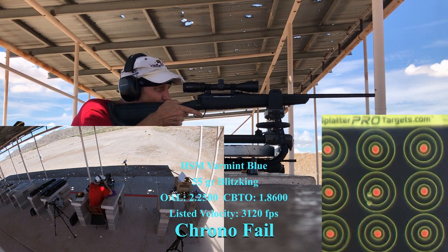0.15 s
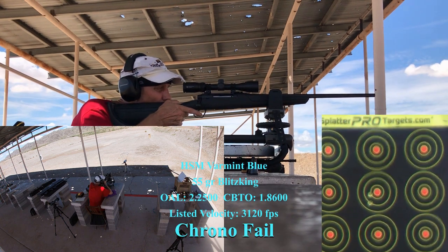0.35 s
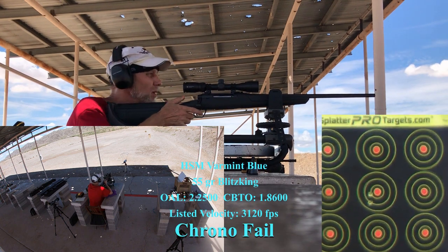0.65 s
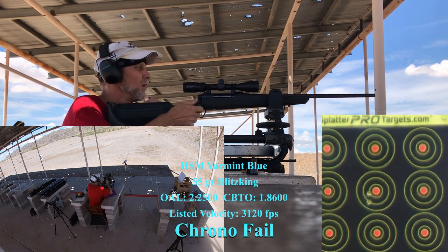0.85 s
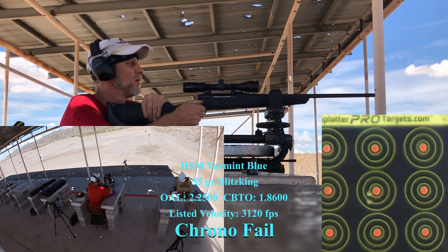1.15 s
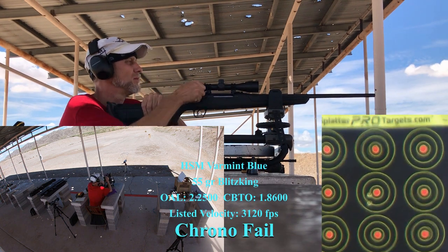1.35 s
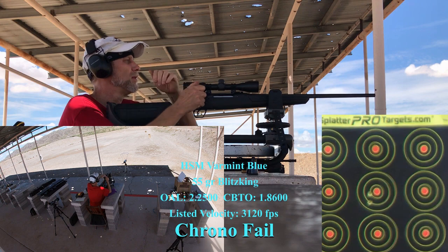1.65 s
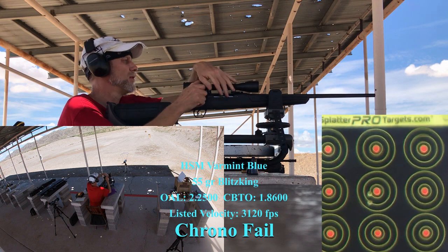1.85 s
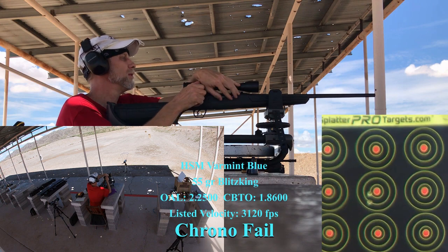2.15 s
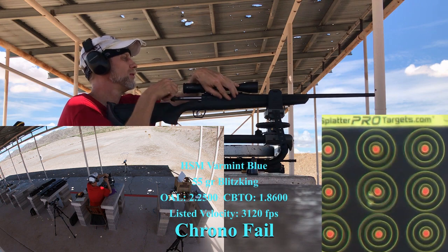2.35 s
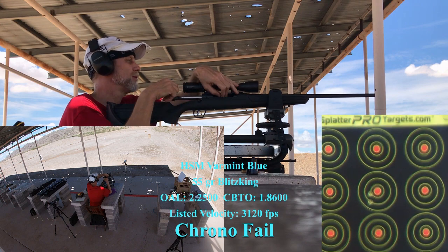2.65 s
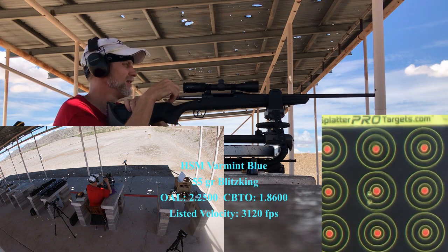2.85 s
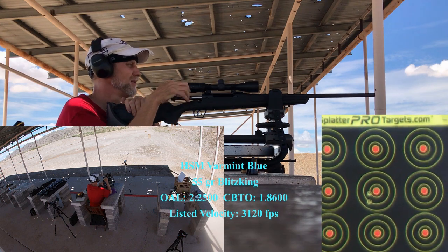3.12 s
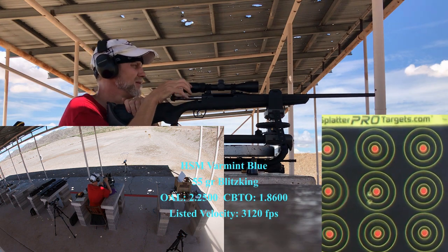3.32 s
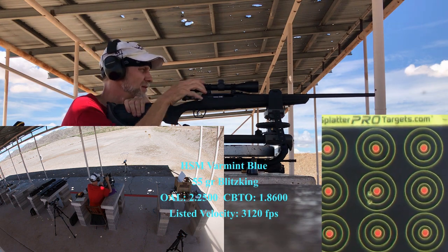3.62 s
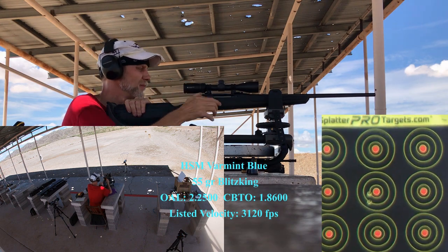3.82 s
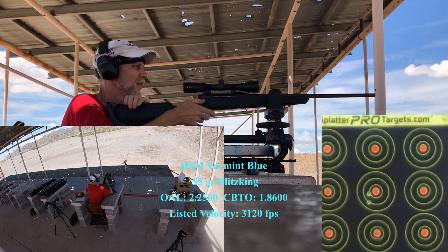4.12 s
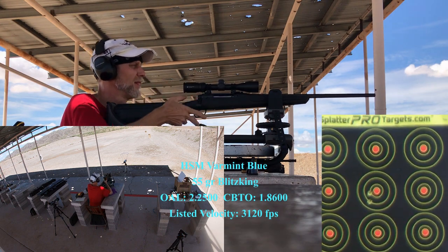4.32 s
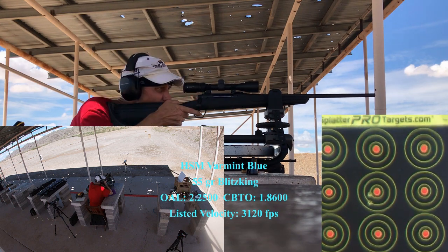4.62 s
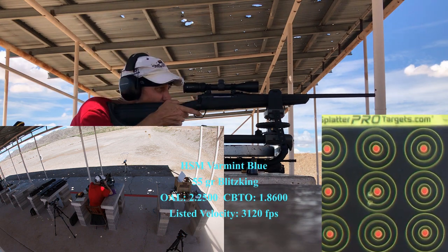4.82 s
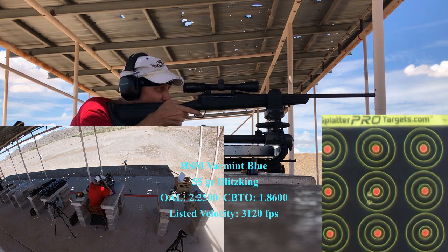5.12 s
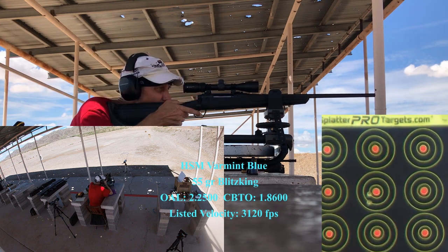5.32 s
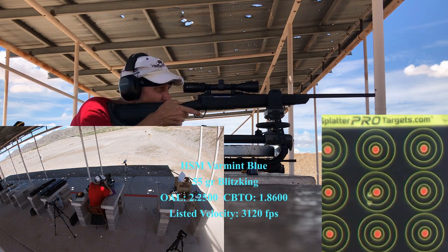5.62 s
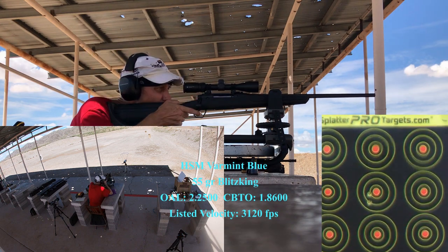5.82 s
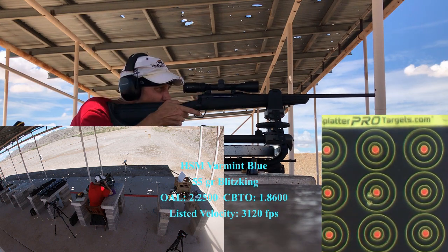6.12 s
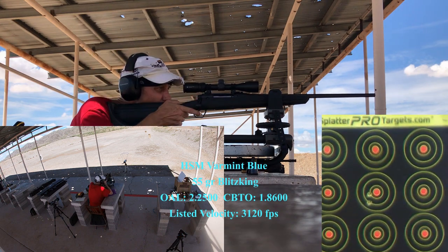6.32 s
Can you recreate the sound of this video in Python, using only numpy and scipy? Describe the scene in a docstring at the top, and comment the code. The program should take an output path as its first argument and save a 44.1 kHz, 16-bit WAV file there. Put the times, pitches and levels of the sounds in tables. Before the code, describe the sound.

A rifle bolt is lifted, yanked back with a brass ping, then shoved forward and locked with hard steel clacks under an outdoor range roof.

```python
"""Under the roof of an outdoor range: light wind on the microphone, a wide hiss, a far machine's hum and a
rolling echo; loose brass tinkles on the bench. Then a rifle bolt straight ahead is lifted and pulled back
(the spent case pings and is picked out), pushed forward and locked; hand and sleeve rub from the pull on.
Each steel contact is a noise crack plus ringing modes of action and stock, answered by the roof.
Other rifles thump further off, between and after the strokes, as pressure waves with scattered noise."""
import sys
import numpy as np
from scipy import signal
from scipy.fft import rfft, irfft, next_fast_len
from scipy.io import wavfile
from scipy.ndimage import uniform_filter1d, map_coordinates

SR = 44100
rng = np.random.default_rng(int(sys.argv[2]) if len(sys.argv) > 2 else 0)


def master_out(mix):
    """Clip the mix to full scale and print it as 16-bit PCM to the path in sys.argv[1]."""
    frames = np.transpose(np.atleast_2d(mix))
    ceiling = np.clip(frames, -1, 1)
    pcm = np.round(ceiling * 32767).astype(np.int16)
    wavfile.write(sys.argv[1], SR, pcm)


N = 285194  # length in samples


def amp(db):
    """Decibels to gain."""
    return 10 ** (np.asarray(db) / 20)


def unit(x):
    """Scaled to rms 1."""
    return x / np.sqrt(np.mean(x ** 2) + 1e-20)


def along(points, hz):
    """Values at hz, read between (Hz, value) points on a log axis."""
    f, v = np.transpose(points)
    return np.interp(np.log(hz + 1), np.log(f + 1), v)


def level(rows):
    """Gain per sample from (s, dB) rows."""
    s, db = np.transpose(rows)
    return amp(np.interp(np.arange(N) / SR, s, db))


def wobble(rate):
    """A smooth random curve, rate knots a second."""
    knots = rng.standard_normal(int(N * rate / SR) + 4)
    return map_coordinates(knots, [np.arange(N) * rate / SR])


def filtered(x, response):
    """x times a response of frequency."""
    n = x.shape[-1]
    m = next_fast_len(n + 8192)
    return irfft(rfft(x, m) * response(np.fft.rfftfreq(m, 1 / SR)), m)[..., :n]


def noise(spectrum, size, tilt=0):
    """Coloured noise of rms 1, tilted in dB per octave between 1200 and 8000 Hz."""
    def colour(hz):
        octaves = np.log2(np.clip(hz, 1200, 8000))
        return amp(along(spectrum, hz) + tilt * octaves)
    return unit(filtered(rng.standard_normal(size), colour))


def fade(t, t60):
    """Exponential decay, 60 dB in t60 seconds."""
    return np.exp(-np.log(1000) * t / t60)


def dying(spectrum, t60s, size):
    """Noise of rms 1 before its decay, each frequency dying at its own speed."""
    hz, t, z = signal.stft(noise(spectrum, size), SR, nperseg=256)
    decay = fade(t, along(t60s, hz)[:, None])
    return signal.istft(z * decay, SR, nperseg=256)[1][:size]


def ring(modes, t, scatter_db, detune):
    """Struck modes as decaying sines; strengths and pitches vary at random from strike to strike."""
    total = 0
    for hz, db, t60 in modes:
        strength = amp(db + scatter_db * rng.normal())
        pitch = hz * (1 + detune * rng.normal())
        total = total + strength * fade(t, t60) * np.sin(2 * np.pi * pitch * t)
    return total


def add(track, s, sound):
    """Mix a sound into a track at time s."""
    part = track[..., round(s * SR):][..., :sound.shape[-1]]
    part += sound[..., :part.shape[-1]]


def spread(mid, side):
    """Left and right from mid and side."""
    return np.array([mid + side, mid - side])


def stroke(s, db, attack, hold, release):
    """Gain per sample of one movement: it speeds up until s, holds, then slows down."""
    t = np.arange(N) / SR - s
    return amp(db) * fade(np.maximum(-t, 0), attack) * fade(np.maximum(t - hold, 0), release)


def patchy(x, depth_db, width_size=5, span_size=9):
    """Bands several hundred Hz wide that swell and sink at random."""
    z = signal.stft(x, nperseg=256)[2]
    field = uniform_filter1d(rng.standard_normal(z.shape), width_size, axis=0)  # across frequency
    field = uniform_filter1d(field, span_size, axis=1)  # across time
    return unit(signal.istft(z * amp(depth_db * unit(field)), nperseg=256)[1][:len(x)])


# Decay of the sound under the roof. Each row: frequency in Hz, t60 in seconds.
ROOF_T60 = [(200, 0.49), (1000, 0.32), (3000, 0.35), (7000, 0.45), (14000, 0.1)]
# Colour of the roof's answer. Each row: frequency in Hz, relative level in dB.
ROOF_COLOUR = [(150, 7.5), (600, 1), (950, -3.5), (1400, 0), (2300, 1.5), (4500, -5), (8000, -8),
               (15000, -12.5)]


def roofed(x, wet_db, delay=0.014, early_db=-6, late_db=-9, slap_t60=0.16, side_db=-10, near_db=-13):
    """A sound with its surroundings: the bench scatters early, the roof answers later and lingers."""
    t = np.arange(SR // 2) / SR
    bench = amp(early_db) * (t > .003)
    slap = np.where(t < delay, bench, fade(np.abs(t - delay), slap_t60))

    def tail():
        linger = amp(late_db) * (t > delay) * dying(ROOF_COLOUR, ROOF_T60, len(t))
        return slap * noise(ROOF_COLOUR, len(t)) + linger

    answer = spread(tail(), amp(side_db) * tail())
    answer = amp(wet_db) * answer / np.linalg.norm(answer[0])
    near = rng.standard_normal(len(t)) * fade(t, .012)  # scope and tripod reflect differently to each side
    answer = answer + spread(0, amp(near_db) * near / np.linalg.norm(near))
    return x + signal.fftconvolve(x[None], answer, axes=1)[:, :len(x)]


# First reflection off the roof. Each row: frequency in Hz, gain in dB.
REFLECTION = [(500, -25), (2500, -10), (4500, -17.5), (9000, -28)]
REFLECTION_S = .0195  # its delay in seconds


def reflected(x):
    """A sound and its first, weaker and coloured reflection off the roof."""
    def response(hz):
        return amp(along(REFLECTION, hz)) * np.exp(-2j * np.pi * hz * REFLECTION_S)
    return x + filtered(x, response)


# Gusts at the microphone. Each row: time of the peak in seconds, relative buffet level in dB,
# time from peak to 1/e in seconds, relative level in dB of the eddies that differ left to right.
GUSTS = [(.1, -45, 0.23, -48), (1.1, -45, 0.38, -71), (1.9, -41.5, 0.5, -55.5), (3.08, -40, 0.094, -78),
         (5.48, -37.5, 0.16, -81), (6.42, -35.5, 0.28, -81)]
CALM_DB = -56.5  # buffeting between gusts, on the scale of the buffet column


def gusts():
    """Gain per sample of buffeting and eddies: every gust swells and sinks like a bell curve."""
    t = np.arange(N) / SR
    buffet, eddies = amp(CALM_DB), 0
    for s, db, width, eddy_db in GUSTS:
        swell = np.exp(-((t - s) / width) ** 2)
        buffet = buffet + amp(db) * swell
        eddies = eddies + amp(eddy_db) * swell
    return buffet, eddies


# Wind rumble, also the boom of far shots. Each row: frequency in Hz, relative level in dB per Hz.
RUMBLE = [(12, -15), (25, 0), (60, 1.5), (100, -7), (150, -15), (300, -36.5), (800, -59.5)]
# Level of the range's wash and hum: falls by 1 s, then grows again.
# Each row: time in seconds, relative level in dB.
RANGE_LEVEL = [(0, -49), (.6, -49), (1.0, -61), (2.4, -50.5), (4.2, -50.5), (4.65, -46.5), (6.47, -48.5)]
# Wash of the open range. Each row: frequency in Hz, relative level in dB per Hz.
AIR = [(59, -37), (100, -12.5), (170, 0), (197, -3.5), (343, -13), (836, -23.5), (3470, -41), (4200, -42),
       (7610, -50.5), (9410, -47), (10900, -53), (14400, -47.5), (16000, -62.5)]
# Steady wide hiss. Each row: frequency in Hz, relative level in dB per Hz.
HISS = [(60, -5.5), (400, -1.5), (1100, 7), (2500, -8.5), (6500, -15.5), (8000, -23), (15000, -32)]


def outdoors(wind_db=-2.0, air_db=0, hiss_db=-65, side_db=-9, hum_hz=168, hum_db=-1):
    """Wind noise buffets the microphone over the range's wash, a hiss and a machine's wavering sine hum."""
    buffet, swirl = gusts()
    wind = buffet * amp(wind_db + 2.3 * wobble(6.2)) * noise(RUMBLE, N)
    eddy_colour = [(15, -9), (70, 6.5), (140, -9.0), (300, -23), (900, -67.0)]  # (Hz, dB per Hz)
    eddies = swirl * amp(3 * wobble(7)) * noise(eddy_colour, N)
    air = level(RANGE_LEVEL) * amp(air_db + 2.8 * wobble(12)) * noise(AIR, N)
    hiss = amp(hiss_db) * spread(noise(HISS, N), amp(side_db) * noise(HISS, N))
    phase = 2 * np.pi * np.cumsum(hum_hz + 3 * wobble(10)) / SR
    hum = level(RANGE_LEVEL) * amp(hum_db + 4.1 * wobble(11)) * np.sin(phase)
    return spread(wind + air + hum, eddies) + hiss


# Echoes of far shots. Each row: start in seconds, level in dB, rise constant in seconds,
# width as side level in dB.
ROLLS = [(0, -34, 0.0011, -1), (4.48, -46, 0.022, -24)]
# Colour of a rolling echo. Each row: frequency in Hz, relative level in dB per Hz.
ROLL = [(40, -10), (220, -2.5), (450, -8.5), (900, -9), (1800, -20), (4000, -25), (7000, -35.5),
        (15000, -49.5)]
# Decay of a rolling echo. Each row: frequency in Hz, t60 in seconds.
ROLL_T60 = [(200, 8.44), (450, 1.9), (1000, 0.76), (3500, 0.62), (10000, 0.3)]


def rolling_echo():
    """Far shots die away over the range as noise, treble first."""
    out, t = np.zeros((2, N)), np.arange(N) / SR
    for s, db, rise, side_db in ROLLS:
        middle = dying(ROLL, ROLL_T60, N)
        side = amp(side_db) * fade(t, 2.3) * dying(ROLL, ROLL_T60, N)
        add(out, s, amp(db) * (1 - np.exp(-t / rise)) * spread(middle, side))
    return out


# Touches of brass on the bench. Each row: start in seconds, ring level in dB, tick level in dB.
TINKLES = [(.28, -65, -58), (.49, -69, -65), (.624, -69, -50), (.823, -68, -56), (1.966, -62.5, -68),
           (2.001, -60.5, -68)]
# Modes of the loose brass. Each row: frequency in Hz, relative level in dB, t60 in seconds.
LOOSE_BRASS = [(7000, -8, .35), (9730, -2, 0.33), (10250, -9.5, 0.23), (14300, -1, .25)]
# Colour of a tick or a steel contact. Each row: frequency in Hz, relative level in dB per Hz.
CRACK = [(60, -55.5), (250, -33), (600, -13.5), (1500, -4.5), (2500, -3), (4000, -0.5), (4900, -8),
         (6600, 2), (7700, -11), (9500, -5.5), (10600, -16), (13000, -6), (16000, -17.5)]


def loose_brass(tick_t60=0.03):
    """Light touches of loose brass: a tiny noise tick and a thin ring of modes."""
    out, t = np.zeros(N), np.arange(SR // 2) / SR
    for s, ring_db, tick_db in TINKLES:
        tick = amp(tick_db) * noise(CRACK, len(t)) * fade(t, tick_t60)
        thin_ring = amp(ring_db) * ring(LOOSE_BRASS, t, scatter_db=3.5, detune=.008)
        add(out, s, tick + thin_ring)
    return roofed(out, wet_db=-9)


# Steel on steel; the row at 3.954 is the roof's reflection of the blow before.
# Each row: start in seconds, relative level in dB, brightness in dB per octave,
# relative level of the stock knock in dB.
CONTACTS = [(1.311, -44.5, -5.5, -49.5), (1.3422, -36.5, -4, -40.5), (1.388, -21.5, 7, -39),
            (1.4112, -14, -3, -29), (1.512, -36, -8.5, -47), (2.327, -39.5, -5.5, -41),
            (2.347, -40, -2.5, -43.5), (2.3622, -17.5, 8, -39.5), (2.379, -26.5, 7, -34.5),
            (2.3883, -23, 9.5, -32), (2.396, -16, 2.5, -34.5), (2.4069, -13.5, 4, -21),
            (2.4419, -25.5, 12.5, -44.5), (2.591, -36.5, 2, -49.5), (2.6347, -34, -5.5, -49),
            (2.7083, -44, -1, -53), (2.743, -26, 3.5, -60), (3.667, -35, 2, -53), (3.69, -26, 2, -47.5),
            (3.738, -15.5, 2.5, -21.5), (3.75, -25, 3, -36), (3.7905, -16, -0.5, -16.5),
            (3.8005, -13.5, -3.5, -17), (3.8205, -15.5, -3, -34), (3.9354, -16, -3, -26.5),
            (3.954, -21, -4, -33)]
# Modes of the action. Each row: frequency in Hz, relative level in dB, t60 in seconds.
ACTION = [(2360, -1, 0.032), (3900, -1, 0.044), (4140, -5.5, 0.031), (5940, -4, 0.031), (6380, -3, 0.059),
          (8860, -6.5, 0.059), (9750, -10.5, 0.044)]
# Modes of the stock, bolt closed. Each row: frequency in Hz, relative level in dB, t60 in seconds.
STOCK = [(484, -18, 0.05), (680, -14.5, .03), (853, -10.5, 0.033), (953.7, 1, 0.085), (1043, -2.5, 0.075),
         (1180, -10, 0.025)]
# While the bolt is open the stock rings higher: from and to, in seconds.
OPEN_S = (2.35, 3.76)
OPEN_PITCH = 1.11  # factor on the stock's pitch; its decay quickens alike
# a blow of HARD_DB rebounds after REBOUND_S seconds, softer ones sooner; the rebound's gain is REBOUND_DB
HARD_DB, REBOUND_S, REBOUND_DB = -19, 0.0021, -8


def bolt(crack_t60=.012, crack_db=19, steel_db=-13, knock_db=-1, attack=0.0007):
    """Each row is a short crack that rebounds once, rings the action and knocks the stock."""
    out, t = np.zeros((2, N)), np.arange(SR // 2) / SR
    onset = 1 - np.exp(-t / attack)
    burst = fade(t, crack_t60) * onset
    for s, db, tilt, stock_db in CONTACTS:
        rebound_delay = REBOUND_S * amp(db - HARD_DB)
        rebound = amp(REBOUND_DB) * np.interp(t - rebound_delay, t, burst)
        crack = noise(CRACK, len(t), tilt) * (burst + rebound)
        crack = amp(crack_db) * crack / np.linalg.norm(crack)
        steel = amp(steel_db) * ring(ACTION, t, scatter_db=-1, detune=0.0076) * onset
        pitch = OPEN_PITCH if OPEN_S[0] < s < OPEN_S[1] else 1
        knock = amp(stock_db + knock_db) * ring(STOCK, pitch * t, scatter_db=4.5, detune=0.01) * onset
        contact = reflected(amp(db) * (crack + steel))
        add(out, s, roofed(contact, wet_db=-7.5, near_db=-13.5, side_db=-10.5))
        add(out, s, roofed(knock, wet_db=-6.5, near_db=-17))
    return out


# Strokes of the bolt: lift, pull, push, lock. Each row: time of full speed in seconds, relative level
# in dB, attack t60 in seconds, hold in seconds, release t60 in seconds.
SLIDES = [(1.409, -41, 0.14, 0.011, 0.37), (2.376, -28, 0.11, 0.037, 0.24), (3.735, -29.5, 0.26, .09, 0.4),
          (3.981, -50.5, .2, 0.11, 0.83)]
# Colour of the scrape. Each row: frequency in Hz, relative level in dB per Hz.
SCRAPE = [(180, -48.5), (300, -14), (511, -18), (1040, 2.5), (1410, -5), (3520, -6), (3830, -2), (4590, -8),
          (6740, -11), (7690, -14), (12500, -18), (16000, -25.5)]
# Brief squeals of sliding steel. Each row: time of the peak in seconds, pitch in Hz, relative level
# in dB, length between the 1/e points in seconds.
SQUEALS = [(3.766, 12800, -35, 0.012), (3.776, 10300, -38.5, .016), (3.902, 11380, -47, 0.041),
           (3.91, 5820, -43, 0.042)]


def slide(waver=.02):
    """Steel sticks and slips along the raceway as grainy noise; wavering sines are its squeals."""
    speed = sum(stroke(*row) for row in SLIDES)
    grains = noise(SCRAPE, N) * amp(3 * wobble(400))
    friction = speed * patchy(grains, depth_db=3.5) * amp(1)
    t = np.arange(N) / SR
    for s, hz, db, length in SQUEALS:
        tone = np.sin(2 * np.pi * np.cumsum(hz * (1 + waver * wobble(600))) / SR)
        friction = friction + amp(db + 7.5) * np.exp(-(2 * (t - s) / length) ** 2) * tone
    return roofed(friction, wet_db=-6.5, near_db=-13, side_db=-11)


# Modes of the firing-pin spring. Each row: frequency in Hz, relative level in dB, t60 in seconds.
SPRING = [(2245, 1, 0.085), (2395, 7.5, 0.04), (2560, -10, 0.13)]


def cocking(s=1.412, db=-29):
    """Lifting the handle cocks the firing pin, whose spring twangs in a few close modes."""
    out, t = np.zeros(N), np.arange(SR // 2) / SR
    onset = 1 - np.exp(-t / 0.00061)
    add(out, s, amp(db) * ring(SPRING, t, scatter_db=1.5, detune=0.0069) * onset)
    return roofed(out, wet_db=-9.5)


# Hand and sleeve rubbing on the rifle. Each row: time of full speed in seconds, relative level in dB,
# hold in seconds, brightness in dB per octave.
RUBS = [(2.243, -62.5, 0.027, -2.5), (2.799, -50, 0.028, 0.5), (2.912, -43.5, 0.024, 0),
        (3.01, -60.5, 0.15, 0), (3.38, -51, .05, -0.5), (3.47, -40, 0.046, 0), (4.271, -52, 0.021, 0.5),
        (4.347, -46.5, 0.037, -2), (5.435, -54, 0.1, 0), (6.292, -53.5, 0.044, 2)]
# Colour of the cloth. Each row: frequency in Hz, relative level in dB per Hz.
CLOTH = [(180, -40), (300, -5), (1120, 1), (1340, -7), (1780, -3.5), (2360, -7.5), (2700, -3), (7440, -14),
         (9880, -18), (16000, -31)]
RUB_ATTACK, RUB_RELEASE = 2.7, 6.5  # t60 of a rub's rise and fall, in multiples of its hold


def sleeve(grain_db=2.0):
    """Soft, uneven noise of hand and cloth; longer movements start and end more gently."""
    rubs = np.zeros(N)
    for s, db, hold, tilt in RUBS:
        rubs += stroke(s, db, RUB_ATTACK * hold, hold, RUB_RELEASE * hold) * noise(CLOTH, N, tilt)
    grain = unit(amp(grain_db * wobble(150)))
    return roofed(rubs * grain * amp(2.5), wet_db=-13.5, side_db=-15.5, near_db=-21)


# Blows that set the case ringing. Each row: start in seconds, relative level in dB,
# t60 in seconds of the damping by bolt and fingers.
PINGS = [(2.363, -15.5, 0.089), (2.398, -24, 0.36), (2.462, -21.5, 0.13), (2.557, -47.5, 1),
         (2.635, -54, 0.37), (2.7435, -37, 0.066)]
# Modes of the case. Each row: frequency in Hz, relative level in dB, t60 in seconds before damping.
BRASS = [(11660, 1, 0.18), (12880, -14.5, 0.18), (15280, -5, .26)]


def case():
    """The empty case pings in damped modes as it is pulled free and fingered out."""
    out, t = np.zeros(N), np.arange(SR // 2) / SR
    for s, db, damping in PINGS:
        ping = fade(t, damping) * ring(BRASS, t, scatter_db=-0.5, detune=0.0012)
        add(out, s, amp(db - 2.5) * ping)
    return roofed(out, wet_db=-12.5, near_db=-22.0)


def jolt(s=2.409, db=-31, t60=0.17, rise=.008):
    """The bolt hits its rear stop and shakes the whole rifle on its tripod: a burst of low noise."""
    t = np.arange(SR // 2) / SR
    out = np.zeros((2, N))
    colour = [(80, -34), (180, 0.5), (330, -6.5), (520, -7.0), (800, -5.5), (1500, -29.5)]  # (Hz, dB per Hz)
    body = noise(colour, len(t))
    add(out, s, amp(db + 11) * body * fade(t, t60) * (1 - np.exp(-t / rise)))
    return out


# Pressure pulses of shots from other firing points; the one at 5.664 is a roof echo.
# Each row: start in seconds, pressure wave level in dB, its length in seconds,
# relative level of the scattered sound in dB.
SHOTS = [(3.15, -25.5, 0.012, -51), (3.163, -20, 0.0079, -30.5), (4.482, -34, .012, -54),
         (5.64, -16.5, 0.0086, -30.5), (5.664, -22.5, 0.0075, -33.5)]
# Colour of the scattered sound. Each row: frequency in Hz, relative level in dB per Hz.
REPORT = [(40, -16), (130, 0.5), (300, -4), (800, -6), (1600, -13.5), (4000, -21), (6000, -41.5),
          (15000, -78)]


def shots(t60=0.19, linger_db=-11, linger_t60=0.89, side_db=-22, dull_db=-6, boom_db=-15, boom_t60=0.43):
    """A push and pull of pressure, a low boom, and noise off berms and roof, duller as it lingers."""
    out, t = np.zeros((2, N)), np.arange(SR) / SR
    swell = 1 - np.exp(-(t / 0.007) ** 2)

    def echoes():
        prompt = fade(t, t60) * noise(REPORT, len(t))
        return prompt + amp(linger_db) * fade(t, linger_t60) * noise(REPORT, len(t), dull_db)

    for s, wave_db, length, scatter_db in SHOTS:
        push_pull = np.sin(2 * np.pi * t / length) * (t < length)
        wave = amp(wave_db) * push_pull * np.clip(.5 + t / length, 0, 1)
        boom = amp(wave_db + boom_db) * swell * fade(t, boom_t60) * noise(RUMBLE, len(t))
        scattered = amp(scatter_db) * swell * spread(echoes(), amp(side_db) * echoes())
        add(out, s, wave + boom + scattered)
    return out


def scene():
    """The rifle straight ahead, the range all round."""
    rifle = bolt() + slide() + cocking() + sleeve() + case() + jolt()
    return outdoors() + rolling_echo() + loose_brass() + rifle + shots()


TOP_HZ = 15900  # upper band limit


def record(dry):
    """The microphone's sound is cut steeply above its band limit."""
    return filtered(dry, lambda hz: 1 / (1 + (hz / TOP_HZ) ** 160))


dry = scene()
out = record(dry)
master_out(out)
```